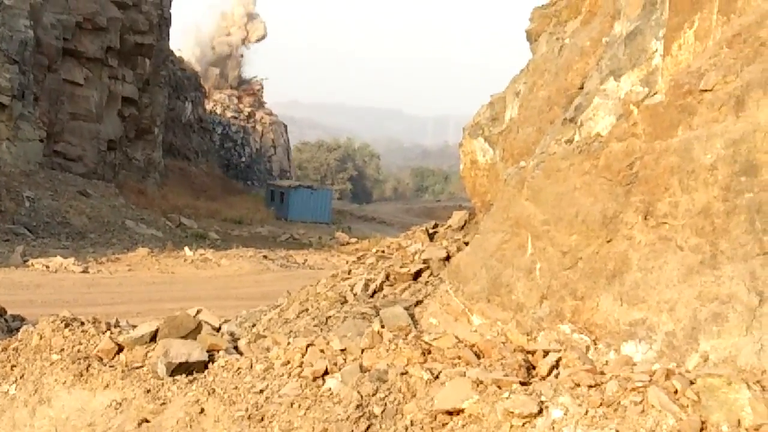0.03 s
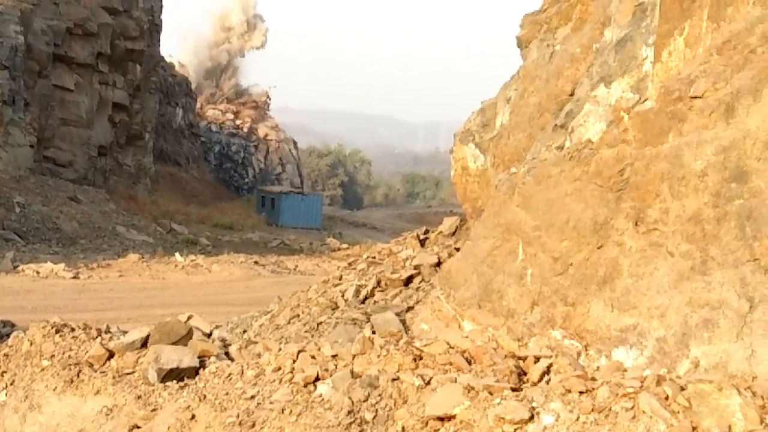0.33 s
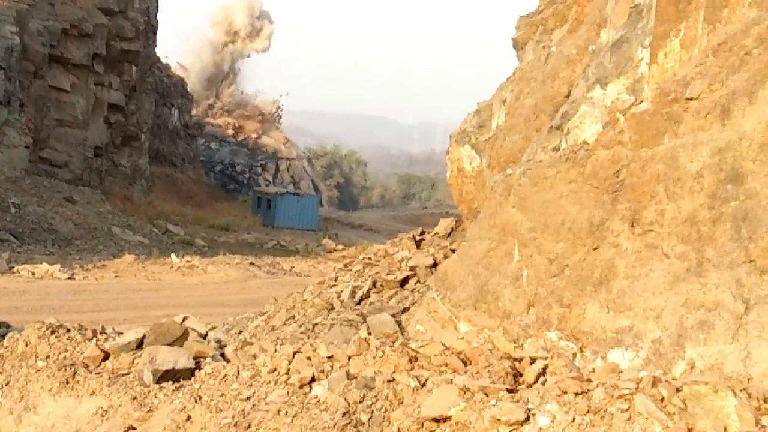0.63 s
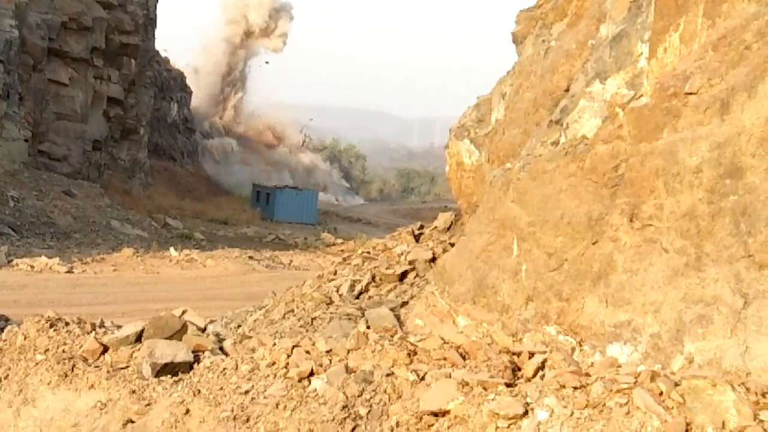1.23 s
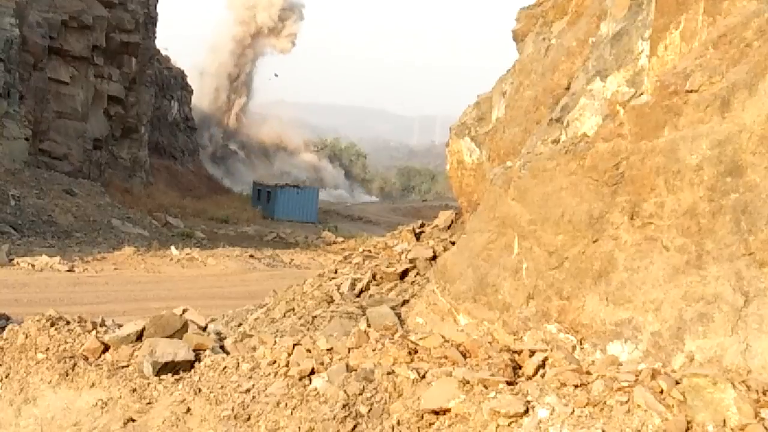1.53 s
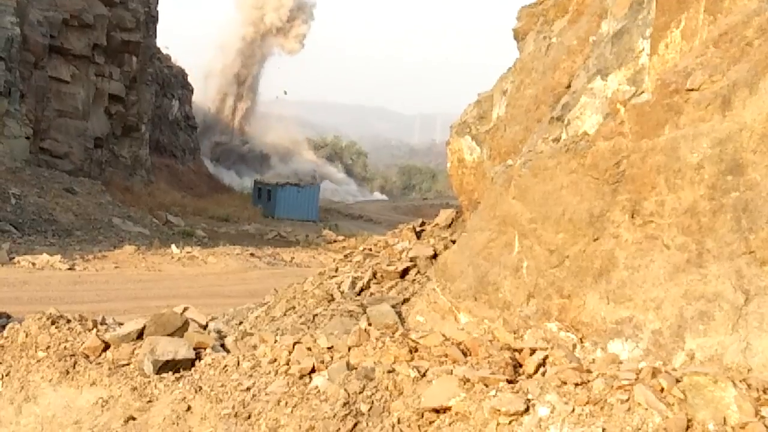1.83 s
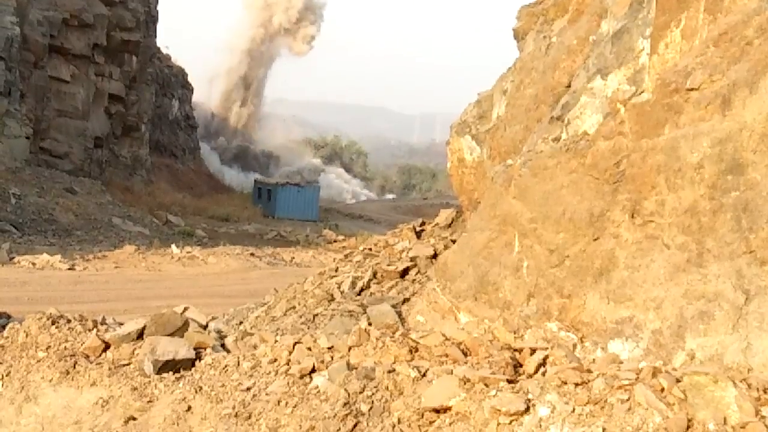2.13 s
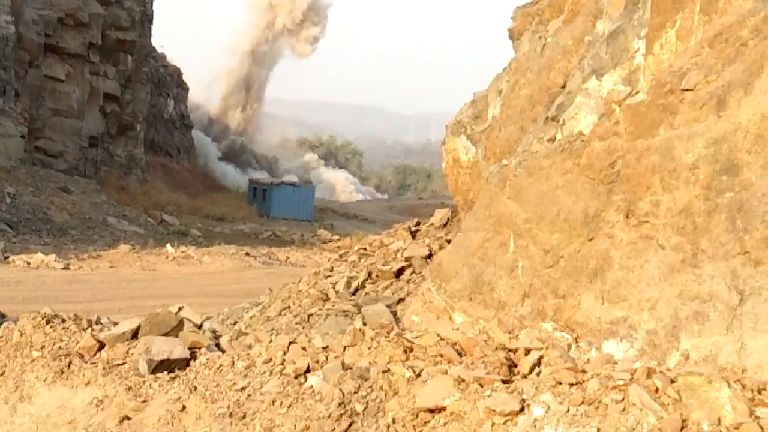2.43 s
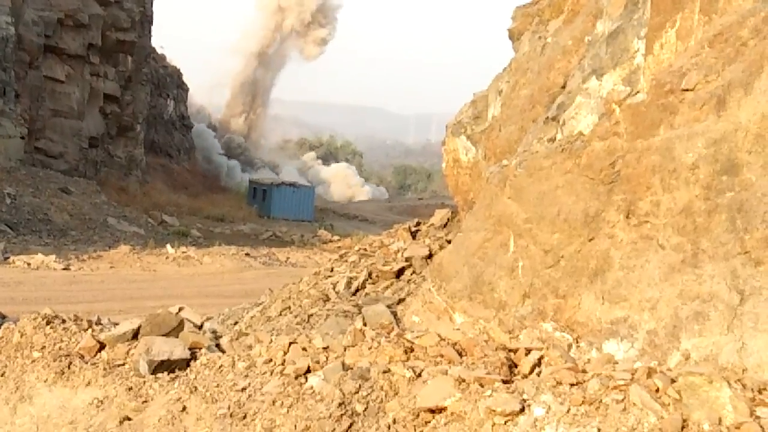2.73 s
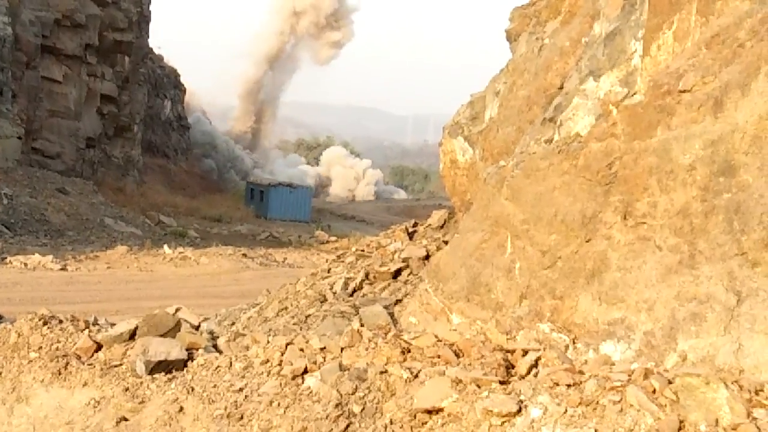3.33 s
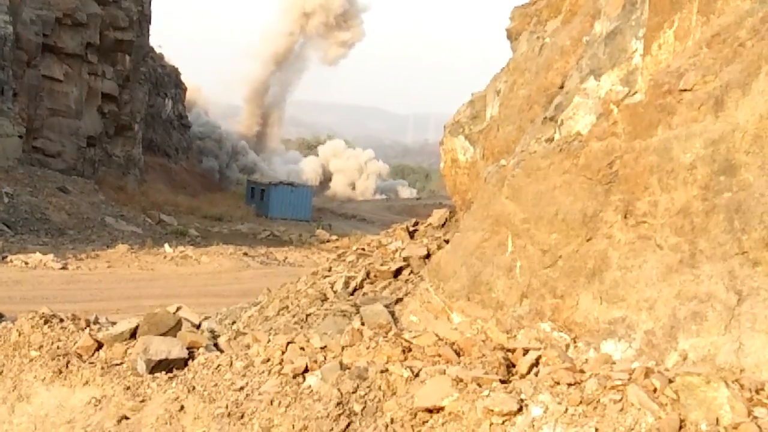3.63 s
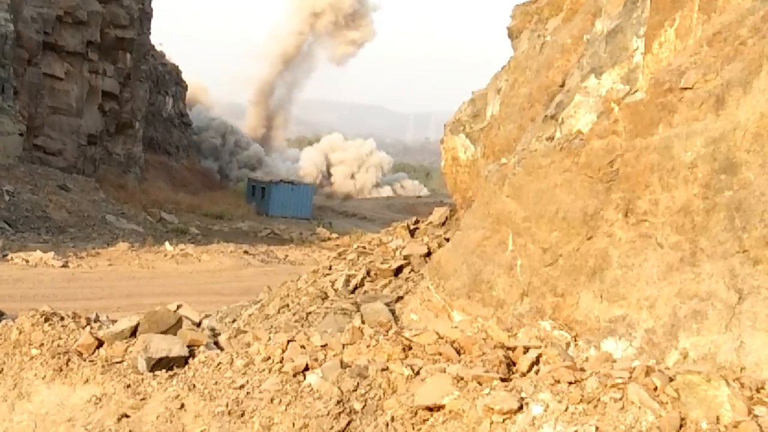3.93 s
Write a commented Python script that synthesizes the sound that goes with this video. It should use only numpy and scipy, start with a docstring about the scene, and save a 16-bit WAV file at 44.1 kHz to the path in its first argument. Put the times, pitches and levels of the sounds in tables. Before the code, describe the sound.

A loud quarry blast goes off in a rapid ripple of cracks and booms, briefly overloading the distant microphone. Rock then collapses in two clattering waves with deep boulder thuds, and the last stones knock into place outdoors.

```python
"""A quarry, some way from the blast: a ripple of delayed charges cracks and booms, overloads the
microphone and rolls round the rock walls, while the lifting rock swells deep underneath.
The face collapses in two waves of tumbling stone, with heavy blocks and boulders thudding in it.
A few chips tick close by, and the last stones knock into place over faint open air."""
import sys
import numpy as np
from scipy import signal
from scipy.fft import rfft, irfft, next_fast_len
from scipy.io import wavfile
from scipy.ndimage import uniform_filter1d, map_coordinates

SR = 44100
rng = np.random.default_rng(int(sys.argv[2]) if len(sys.argv) > 2 else 0)


def wav_out(sig):
    """Save sig, one row per channel (or a flat mono array), as 16-bit PCM at SR to the path in sys.argv[1]."""
    wavfile.write(sys.argv[1], SR, np.round(np.clip(np.atleast_2d(sig).T, -1, 1) * 32767).astype(np.int16))


N = 176400
COLLAPSE_RISE_S = .42  # the face starts to fall under the blast


def amp(db):
    return 10 ** (np.asarray(db) / 20)


def unit(x):
    return x / np.sqrt(np.mean(x ** 2) + 1e-20)


def clock(samples=N):
    return np.arange(samples) / SR


def decay(t, t60_s, hold_s=0):
    """Full level until hold_s, then down 60 dB every t60_s."""
    return amp(-60 * np.maximum(t - hold_s, 0) / t60_s)


def add(track, start_s, sound):
    """Mix a sound in from start_s."""
    i = max(0, round(start_s * SR))
    track[i:i + len(sound)] += sound[:N - i]


def filtered(x, response):
    """x through a frequency response."""
    size = next_fast_len(len(x) + SR // 4)
    return irfft(rfft(x, size) * response(np.fft.rfftfreq(size, 1 / SR)), size)[:len(x)]


def eq_gain(hz, eq):
    """Gain at hz of an EQ curve of (freq_hz, gain_db) points."""
    freq_hz, gain_db = np.transpose(eq)
    return amp(np.interp(np.log(hz + 1), np.log(freq_hz), gain_db))


def colour(x, eq):
    """x through an EQ curve, at rms 1."""
    return unit(filtered(x, lambda hz: eq_gain(hz, eq)))


def band(x, pitch_hz, width_oct):
    """x narrowed to a band round a pitch, at rms 1."""
    return unit(filtered(x, lambda hz: np.exp(-.5 * (np.log2((hz + 1) / pitch_hz) / width_oct) ** 2)))


def wobble(per_s):
    """A smooth random curve through per_s points a second."""
    return map_coordinates(rng.standard_normal(400), [clock() * per_s], mode="mirror")


def steadied(x, window):
    """x with its power evened out over a window of samples."""
    return x / np.sqrt(np.abs(uniform_filter1d(x * x, window)) + 1e-6)


def steady_noise(samples, eq, window):
    """Coloured noise at an even level."""
    return steadied(colour(rng.standard_normal(samples), eq), window)


def impacts(per_s, spread_db):
    """A random hail of impulses of mixed size."""
    hits = rng.random(N) < per_s / SR
    size = amp(spread_db * np.minimum(rng.standard_normal(N), 2))
    return hits * size * rng.choice([-1, 1], N)


def open_air():
    """A faint, steady bed of outdoor air."""
    # tone of the air: freq_hz, gain_db
    air_eq = [(30, -5.5), (70, 4), (200, -4.5), (400, -4), (580, -20), (900, -7.5), (1280, -7.5),
              (1550, -23.5), (1950, -20), (3000, -19.5), (5000, -29.5), (8000, -33.5), (15000, -36)]
    return amp(-61.5) * colour(rng.standard_normal(N), air_eq)


def pressure_pulse(eq):
    """A sudden pressure pulse of peak 1 with the given spectrum."""
    cepstrum = irfft(np.log(eq_gain(np.fft.rfftfreq(4096, 1 / SR), eq)))
    fold = 1 + np.sign(np.fft.fftfreq(len(cepstrum)))  # minimum phase packs the energy into the attack
    pulse = irfft(np.exp(rfft(cepstrum * fold)))
    return pulse / np.abs(pulse).max()


def blast():
    """Each charge gives a pressure front, a crack of close reflections, wall scatter, snap and boom."""
    # the firing sequence: start_s, crack_db, boom_db, snap_db
    charges = [(.0085, -12.5, -22, -54), (.054, -16.5, -13, -70.5), (0.073, -13.5, -14, -72.5),
               (.079, -6, -10.5, -61.5), (0.0859, 1.5, -12, -35), (0.0929, -4, -8, -38.5),
               (0.101, 2, -10, -29.5), (.118, -6.5, -10, -39.5), (0.123, 4, -9, -28),
               (0.153, -9.5, -10, -53.5), (0.1582, 1.5, -7, -21.5), (0.1663, -7, -14, -29.5),
               (.176, -12, -11, -29.5), (0.1866, 4, -3.5, -30.5), (.192, 1.5, -11, -25.5),
               (.211, -0.5, -8, -41.5), (0.218, -8, -7.5, -39), (.2265, 0, -10.5, -35), (0.231, 2, -8, -29),
               (.261, -4, -2.5, -36), (0.28, -7.5, -2.5, -36), (.303, -8.5, -10, -60.5),
               (0.3102, -4, -9.5, -38.5)]
    # tone of the direct pressure front: freq_hz, gain_db
    front_eq = [(60, -19.5), (300, -14.5), (560, -9.5), (950, 2.5), (1250, -1.5), (1600, -13.5),
                (1900, -3.5), (2600, -16.5), (4100, -23.5), (5500, -42.5), (8000, -59.5), (16000, -83.5)]
    # tone of its close reflections: freq_hz, gain_db
    crack_eq = [(60, -22), (300, 3), (560, -14.5), (950, 3.5), (1250, 7), (1600, -6), (1900, -7),
                (2600, -12.5), (3400, -16.5), (4100, -14), (5200, -26), (7500, -45), (12000, -52.5),
                (16000, -61.5)]
    # tone of the scatter from the rock walls: freq_hz, gain_db
    walls_eq = [(100, -18), (300, -6), (560, -3.5), (950, -1), (1250, -1.5), (1600, -7.5), (1900, -5.5),
                (2600, -13), (3400, -15.5), (4100, -16), (5200, -24), (7500, -37.5), (12000, -53),
                (16000, -62.5)]
    # treble of a strong front's steep edge: freq_hz, gain_db
    snap_eq = [(1500, -21), (4000, 8), (8000, -3), (12000, -6.5), (16000, -17)]
    # low body of a charge: freq_hz, gain_db
    boom_eq = [(20, -43), (33, -24.5), (48, -4), (78, 5), (102, -7.5), (135, 1.5), (190, -6), (250, 2.5),
               (310, 0), (400, -0.5), (540, -17.5), (900, -32), (2000, -54.5), (6000, -88.5)]
    out, t = np.zeros(N), clock(SR // 2)
    walls_rise_s, boom_rise_s = .0069, .0017
    crack_env = amp(-7.5) * decay(t, t60_s=.033)
    walls_env = amp(-20.5) * (1 - np.exp(-t / walls_rise_s)) * decay(t, t60_s=.28)
    spray_env = amp(-12) * decay(t, t60_s=.23)  # the snap scatters off the rubble
    snap_env = amp(3) * (decay(t, t60_s=.01) + spray_env)
    boom_env = (1 - np.exp(-t / boom_rise_s)) * decay(t, t60_s=.09, hold_s=.006)
    front, echo = amp(-2) * pressure_pulse(front_eq), pressure_pulse(crack_eq)
    for start_s, crack_db, boom_db, snap_db in charges:
        crack = signal.fftconvolve(rng.standard_normal(len(t)) * crack_env, echo)
        crack *= np.linalg.norm(crack_env) / np.linalg.norm(crack)
        add(out, start_s, amp(crack_db) * front)
        add(out, start_s, amp(crack_db) * crack)
        add(out, start_s, amp(crack_db) * steady_noise(len(t), walls_eq, window=600) * walls_env)
        add(out, start_s, amp(snap_db) * steady_noise(len(t), snap_eq, window=600) * snap_env)
        add(out, start_s, amp(boom_db) * steady_noise(len(t), boom_eq, window=900) * boom_env)
    return out


def heave():
    """The rock mass lifts under the charges with a deep swell."""
    t = clock()
    start_s, rise_s = .041, .025
    swell = np.clip((t - start_s) / rise_s, 0, 1) * decay(t, t60_s=.16, hold_s=.22)
    sub = band(rng.standard_normal(N), pitch_hz=62, width_oct=.25)
    return amp(-19.5) * swell * steadied(sub, window=1500)


def ledges(x):
    """x with early reflections from the ledges round the slide."""
    echoes, spread_s = 12, .03
    response = np.zeros(SR // 4)
    response[0] = 1
    for delay_s, gain in zip(spread_s * rng.random(echoes), unit(rng.standard_normal(echoes))):
        add(response, delay_s, np.array([gain * amp(-13.5) / np.sqrt(echoes)]))
    return signal.fftconvolve(x, response)[:N]


def rockfall():
    """Countless stones and their grit collide, heard directly and off the ground; sand patters closer."""
    # the two waves of the slide: time_s, stone_db, treble_db
    slide = [(0.38, -36, -51.5), (0.45, -37, -50.5), (0.51, -33, -47.5), (0.71, -29.5, -43.5),
             (0.95, -36, -47.5), (1.01, -39.5, -50.5), (1.38, -35, -51), (1.91, -29, -40.5),
             (2.19, -29.5, -42.5), (2.41, -34.5, -49.5), (2.48, -34.5, -48.5), (2.69, -47, -63),
             (3.12, -55, -75.5), (4.0, -65.5, -90)]
    # clatter of tumbling stone: freq_hz, gain_db
    stone_eq = [(200, -30.5), (450, -18), (600, -20), (720, -3), (950, 2.5), (1290, 5.5), (1410, -3),
                (1530, 1.5), (1650, -6), (1850, 1.5), (2250, -6), (2500, -4), (2900, -13), (3300, -18.5),
                (4200, -29), (6500, -55), (9000, -100)]
    # crunch of grit: freq_hz, gain_db
    grit_eq = [(1000, -33), (2500, -1), (3800, 1.5), (4500, -5.5), (5600, -9), (6400, -16), (7000, -34.5),
               (9000, -44.5), (16000, -60)]
    # fizz of sand: freq_hz, gain_db
    sand_eq = [(4000, -29), (7500, -1.5), (11500, 0), (13500, -7), (16000, -14)]
    t = clock()
    time_s, stone_db, treble_db = np.transpose(slide)
    bounce_gain, bounce_s = .34, .0010294  # off the quarry floor
    flutter = amp(.36 * (wobble(per_s=18) + wobble(per_s=60)))
    hail = ledges(impacts(per_s=4500, spread_db=1.5))
    hail = filtered(hail, lambda hz: 1 + bounce_gain * np.exp(-2j * np.pi * hz * bounce_s))
    stone = amp(-1) * colour(hail, stone_eq) * amp(np.interp(t, time_s, stone_db))
    grit = amp(-2) * colour(hail, grit_eq)
    sand_level = amp(-31.5 + 1.5 * wobble(per_s=9))
    sand = sand_level * colour(impacts(per_s=450, spread_db=4), sand_eq)
    treble = (grit + sand) * amp(np.interp(t, time_s, treble_db))
    return (stone + treble) * flutter * np.clip(t / COLLAPSE_RISE_S, 0, 1) ** 2


def collapse():
    """Heavy blocks knock together over the rumble of the ground."""
    # weight of the fall: time_s, rumble_db, blocks_db
    weight = [(0.36, -19.5, -28), (0.7, -24, -28), (0.85, -37.5, -34.5), (0.89, -26.5, -35),
              (0.91, -34, -39), (1.22, -31, -46.5), (1.25, -36, -44), (1.53, -34, -43), (1.61, -39, -35),
              (1.65, -28, -37), (1.84, -30.5, -36.5), (1.91, -26.5, -33), (1.99, -27, -35.5),
              (2.13, -26, -35.5), (2.26, -37.5, -36.5), (2.29, -28, -42.5), (2.35, -30.5, -33.5),
              (2.39, -33.5, -51), (2.47, -33.5, -42.5), (2.74, -49, -56), (2.88, -43, -58.5),
              (3.07, -50.5, -58), (3.31, -45, -61), (4.0, -56, -68)]
    # tone of the shaking ground: freq_hz, gain_db
    rumble_eq = [(15, -39.5), (30, -22), (48, -6), (76, 1.5), (100, -9.5), (130, -5), (180, -14.5),
                 (280, -29), (800, -75)]
    # dull knock of the blocks: freq_hz, gain_db
    blocks_eq = [(80, -25.5), (180, -5), (260, 4), (380, -1), (520, -10), (700, -6), (1100, -29.5),
                 (3000, -67.5)]
    t = clock()
    time_s, rumble_db, blocks_db = np.transpose(weight)
    rumble = amp(-1) * steady_noise(N, rumble_eq, window=4000) * amp(np.interp(t, time_s, rumble_db))
    blocks = colour(impacts(per_s=500, spread_db=-.5), blocks_eq) * amp(np.interp(t, time_s, blocks_db))
    return rumble + blocks * np.clip(t / COLLAPSE_RISE_S, 0, 1)


def boulders():
    """Each big rock lands with a few low swings of the ground."""
    # boulder landings: start_s, level_db, pitch_hz
    landings = [(0.403, -13, 60), (0.532, -11.5, 47.6), (0.666, -13, 70), (0.717, -16, 77),
                (1.147, -21, 61.3), (1.618, -26, 121), (2.105, -17, 114.4), (2.277, -14, 74),
                (2.335, -30.5, 236), (2.885, -35, 85.5), (3.178, -37, 79), (3.36, -33, 116.4)]
    out, t = np.zeros(N), clock(SR // 2)
    rise_s = .014
    thud_env = np.minimum(t / rise_s, 1) * decay(t, t60_s=.061, hold_s=rise_s)
    for start_s, level_db, pitch_hz in landings:
        add(out, start_s, amp(level_db) * thud_env * np.sin(2 * np.pi * pitch_hz * t))
    return out


def chips():
    """Small chips tick near the microphone and skitter briefly."""
    # chip landings: start_s, level_db, pitch_hz
    landings = [(.634, -50, 13500), (.671, -47.5, 11500), (.747, -52, 13000), (.985, -53, 14000),
                (1.176, -42.5, 11000), (1.445, -52, 12000), (1.482, -56, 12000), (1.584, -58, 8000),
                (1.71, -52, 13500), (1.80, -54, 9000), (1.95, -57, 11000), (2.096, -59, 9500),
                (2.214, -33.5, 7000), (2.256, -39, 12000), (2.451, -39.5, 10000), (2.539, -48, 12000),
                (2.756, -47, 10500), (3.781, -49, 10200)]
    out, t = np.zeros(N), clock(SR // 4)
    width_oct, trim_db = .32, -3
    for start_s, level_db, pitch_hz in landings:
        tick = band(rng.standard_normal(len(t)), pitch_hz, width_oct) * decay(t, t60_s=.011)
        bounces = impacts(per_s=690, spread_db=1.5)[:len(t)]
        skitter = amp(-17.5) * band(bounces, pitch_hz, width_oct) * decay(t, t60_s=.3)
        add(out, start_s, amp(level_db + trim_db) * (tick + skitter))
    return out


def settling_stones():
    """The last stones knock into place as the pile settles."""
    # single knocks: start_s, level_db, pitch_hz
    knocks = [(2.58, -54, 1100), (2.83, -54, 910), (2.925, -47.5, 1910), (3.125, -59, 1940),
              (3.16, -51.5, 990), (3.21, -59.5, 1300), (3.49, -59, 2050), (3.59, -50.5, 1200),
              (3.695, -53.5, 1330)]
    out, t = np.zeros(N), clock(SR // 4)
    for start_s, level_db, pitch_hz in knocks:
        knock = band(rng.standard_normal(len(t)), pitch_hz, width_oct=.3) * decay(t, t60_s=.13)
        add(out, start_s, amp(level_db) * knock)
    return out


def scene():
    """Open air, the blast and the fall of rock that follows, in mono."""
    mix = open_air() + blast() + heave() + rockfall() + collapse()
    return (mix + boulders() + settling_stones() + chips())[None]


def record(dry):
    """The microphone loses the deepest bass, clips on the charges and drops the highest treble."""
    low_cut_hz, top_hz, drive_db, knee = 33, 15700, -.5, 9
    low_cut = signal.butter(4, low_cut_hz, "highpass", fs=SR, output="sos")
    driven = signal.sosfilt(low_cut, dry[0]) * amp(drive_db)
    clipped = driven / (1 + np.abs(driven) ** knee) ** (1 / knee)
    return filtered(clipped, lambda hz: hz < top_hz)[None]


dry = scene()
out = record(dry)
wav_out(out)
```